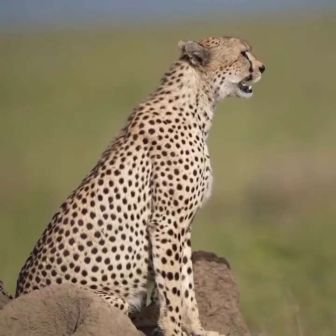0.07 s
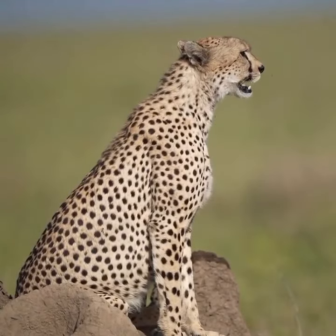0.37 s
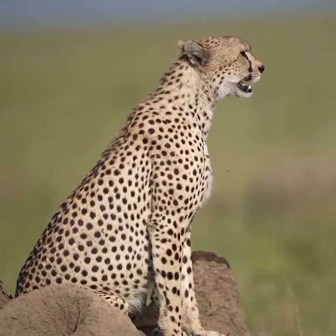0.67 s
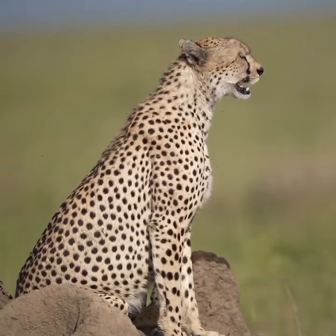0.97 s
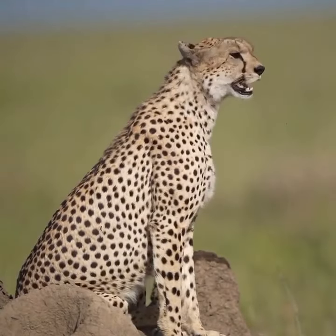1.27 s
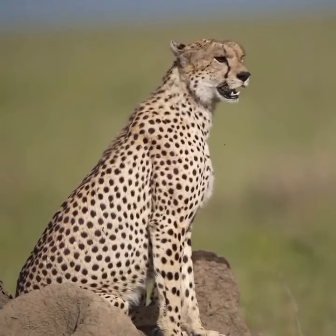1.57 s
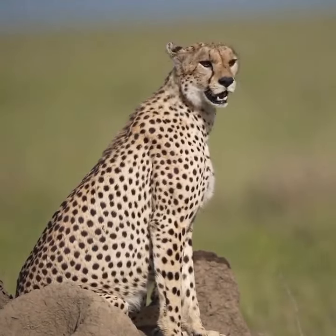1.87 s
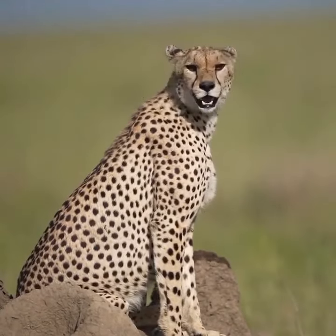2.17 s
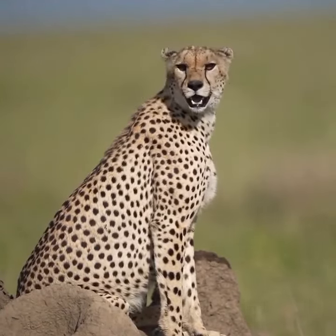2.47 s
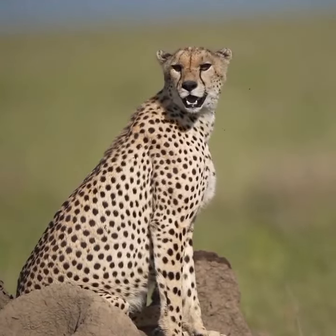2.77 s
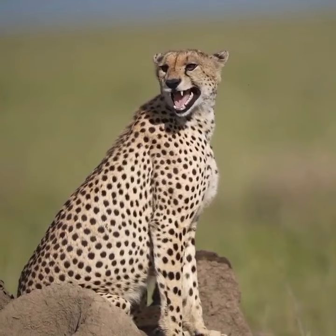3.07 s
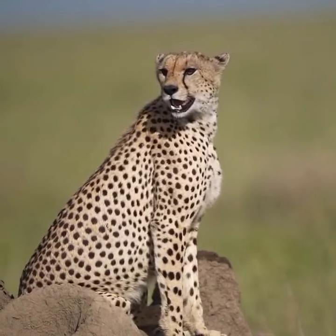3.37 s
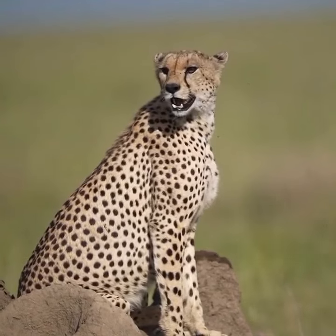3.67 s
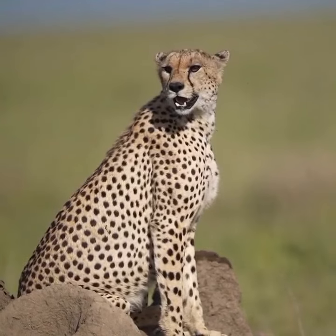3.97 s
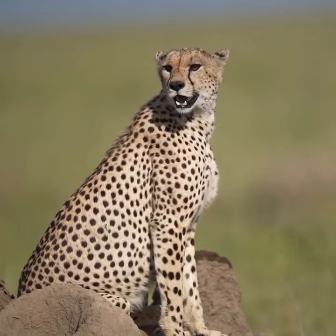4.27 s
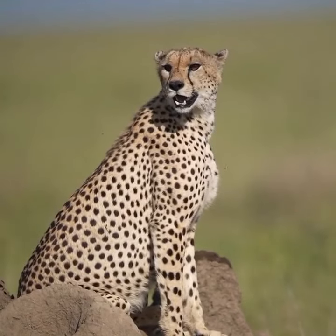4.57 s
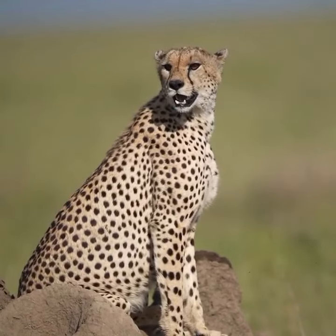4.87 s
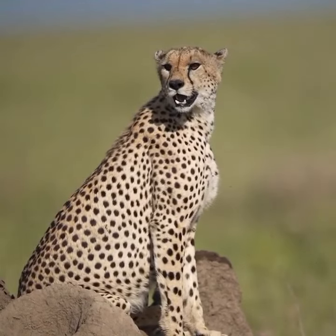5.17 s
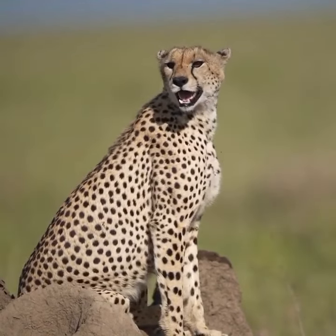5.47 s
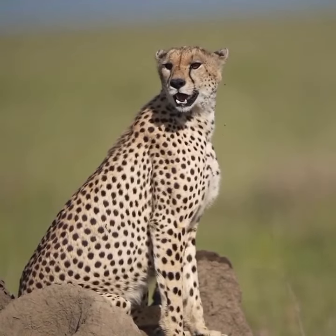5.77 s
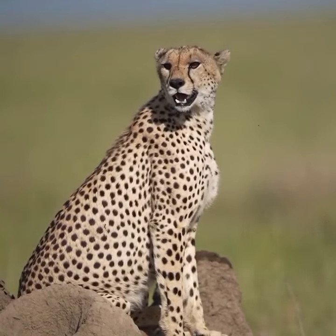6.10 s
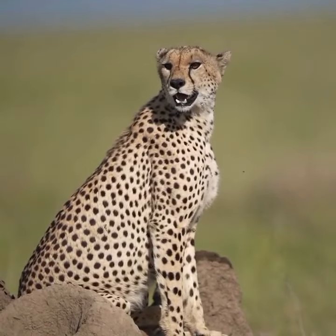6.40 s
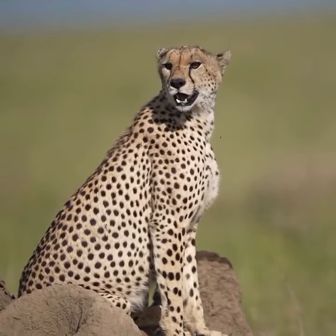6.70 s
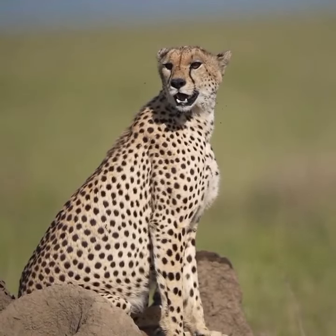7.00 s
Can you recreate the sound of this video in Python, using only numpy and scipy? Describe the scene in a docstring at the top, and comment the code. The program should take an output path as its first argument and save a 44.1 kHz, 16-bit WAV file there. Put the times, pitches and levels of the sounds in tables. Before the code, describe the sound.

On an open grassy plain, a cheetah gives three short chirps about two seconds apart, each rising, then turning rough as it falls. The last two are louder. Wind buffets the microphone with rumble and short thumps, dying down before the final call, which follows one soft tick. Small birds whistle, twitter and chip further off over a faint hiss.

```python
"""Cheetah chirps on a windy plain

A cheetah chirps three times, its vocal folds driving the resonances of throat and mouth: each call
arches up with one push of effort, turns rough as it falls and ends low. Turbulent gusts buffet a stereo
microphone in short thumps. Further off, over a faint hiss, small birds repeat phrases, whistles and
chips, mostly gliding near-sine tones. One soft tick comes before the last chirp."""
import sys
import numpy as np
from scipy import signal
from scipy.fft import rfft, irfft
from scipy.io import wavfile
from scipy.ndimage import map_coordinates

SR = 44100
rng = np.random.default_rng(int(sys.argv[2]) if len(sys.argv) > 2 else 0)


def generate_wav(signal):
    """Clip the signal to [-1, 1] and save it as 16-bit WAV at the path in sys.argv[1]."""
    frames = np.transpose(np.atleast_2d(signal))
    scaled = np.clip(frames, -1, 1) * 32767
    pcm = np.round(scaled).astype(np.int16)
    wavfile.write(sys.argv[1], SR, pcm)


N = 319284
T = np.arange(N) / SR
FREQ = np.maximum(np.fft.rfftfreq(N, 1 / SR), 1)
SIDES = np.array([[.5], [-.5]])  # splits a left-minus-right difference between the channels


def undb(db):
    """Decibels to amplitude ratio."""
    return 10 ** (np.asarray(db) / 20)


def unit(x):
    """Normalisation to rms 1."""
    return x / np.sqrt(np.mean(np.abs(x) ** 2) + 1e-20)


def over_time(points, t):
    """Linear interpolation of a table over time."""
    return np.interp(t, *np.transpose(points))


def over_frequency(points, hz):
    """Interpolation of a table on a log frequency axis."""
    f, value = np.transpose(points)
    return np.interp(np.log(hz), np.log(f), value)


def noise(gain):
    """Spectral shaping: noise of rms 1 with the given relative gain at each frequency."""
    return unit(irfft(rfft(rng.standard_normal(N)) * gain, N))


def wobble(hz, size):
    """Random modulation: a smooth signal of spread near 1, band-limited to about hz."""
    knots = rng.standard_normal(size // 4 + 8)
    used = int(size * min(2 * hz / SR, 1 / 4)) + 8
    return map_coordinates(knots[:used], [np.arange(size) * 2 * hz / SR], order=3, mode="mirror")


def add(out, sound, s):
    """Superposition: mix a sound in at time s."""
    i = int(s * SR)
    part = sound[..., max(-i, 0):N - i]
    out[..., max(i, 0):max(i, 0) + part.shape[-1]] += part


def scatter(x, t60_s):
    """Diffuse reflection: grass and mounds return a decaying tail, different on each side."""
    t = T[:SR // 2]
    tail = rng.standard_normal((2, len(t))) * np.exp(-np.log(1000) * t / t60_s)
    tail *= 1 - np.exp(-t / 0.0041)
    tail /= np.linalg.norm(tail, axis=1, keepdims=True)
    return signal.fftconvolve(x[None], tail, axes=1)[:, :N]


# spectrum of the background hiss: frequency_hz, gain_db
AIR_SPECTRUM = [(24, -28), (40, -7.5), (123, -8.5), (350, -11), (577, 3.5), (637, -2), (1020, -6.5),
                (1910, -5.5), (2160, -6.5), (2570, -5.5), (3740, -4), (7160, -5.5), (9890, -12),
                (13700, -13), (15500, -13)]


def plain_air(hiss_db=-54.5, lift_db=0.57, whirr_hz=2220, whirr_db=-72):
    """Ambient noise: a steady hiss, most coherent between the sides in the bass, and a thin whirr."""
    colour = undb(over_frequency(AIR_SPECTRUM, FREQ))
    alike = 1 / (1 + FREQ / 900)
    mid = noise(colour * np.sqrt(1 + alike))
    side = noise(colour * np.sqrt(1 - alike))
    whirr = noise(np.exp(-((FREQ - whirr_hz) / 90) ** 2 / 2))
    whirr *= unit(undb(4.3 * wobble(17, N)))
    return undb(hiss_db + lift_db) * unit(mid + 1.8 * SIDES * side) + undb(whirr_db) * whirr


# slant of the wind across the two capsules: time_s, left_lead_rad
WIND_SLANT = [(0, -1.1), (.5, 1.6), (1.8, 1.4), (2.2, 1.6), (2.7, 1.48), (3.1, 1.35), (3.7, 1.16),
              (4.3, 1.62), (5, -0.74), (7.2, -2.3)]
# the hardest eddies: centre_s, peak_db, pitch_hz
EDDIES = [(0.005, -10, 534), (0.014, -8.5, 480), (0.0474, -6, 407), (0.0925, -12, 590), (0.1128, -23, 440),
          (0.1573, -18.5, 418), (0.1976, -14, 424), (0.4133, -9, 346), (0.4229, -12, 502),
          (0.4854, -8, 465), (0.5194, -11.5, 350), (0.9134, -19.5, 456), (1.092, -20, 355),
          (1.781, -17.5, 362), (1.833, -20, 374), (1.9484, -13.5, 336), (2.0511, -9, 560),
          (2.0902, -10, 513), (2.3225, -12.5, 360), (2.3568, -12, 380), (2.482, -13, 403),
          (2.657, -17, 331), (2.69, -15, 396), (2.729, -9.5, 374), (2.76, -12, 510), (2.77, -11, 420),
          (2.807, -7, 433), (2.843, -13.5, 450), (2.876, -16.5, 563), (2.9687, -15, 516), (3, -9, 760),
          (3.0554, -10, 515), (3.0733, -10, 392), (3.0832, -8, 460), (3.1485, -17.5, 440),
          (3.16, -14.5, 585), (3.5599, -9, 306), (3.565, -12, 328), (3.602, -16, 500), (3.62, -16, 475),
          (3.683, -9, 515), (3.7397, -14, 387), (3.796, -11, 456), (3.9031, -7.5, 533), (3.9183, -9, 550),
          (3.947, -9.5, 547), (3.962, -10, 650), (3.982, -12, 720), (3.992, -13, 780), (4.0314, -8.5, 730),
          (4.045, -11, 400), (4.062, -32, 297), (4.091, -22, 280), (4.0799, -9, 444), (4.1126, -12.5, 520),
          (4.1581, -8.5, 447), (4.2996, -12, 501), (4.329, -12.5, 432), (4.4473, -20, 239),
          (4.8125, -23, 317), (5.098, -24.5, 282)]


def thumps(gain_db=-3, width_cycles=0.53, snap=0.21):
    """Pressure pulses: a hard eddy gives the microphone one or two swings with a sharper core."""
    out = np.zeros((2, N))
    t = T[:SR // 40] - .0125
    polarities = np.pi * rng.integers(0, 2, (len(EDDIES), 2))
    for (s, db, hz), (swing_rad, core_rad) in zip(EDDIES, polarities):
        phase = 2 * np.pi * hz * t + SIDES * over_time(WIND_SLANT, s) * 0.79
        envelope = np.exp(-(t * hz / width_cycles) ** 2)
        pressure = np.cos(phase + swing_rad) + snap * np.cos(2 * phase + core_rad)
        add(out, undb(db + gain_db) * envelope * pressure, s + t[0])
    return out


# steady wind between the gusts: time_s, level_db
BREEZE_LEVEL = [(0, -40), (.58, -42), (.7, -50), (1.4, -51.5), (1.62, -57.5), (1.85, -33.5), (2.7, -37),
                (4.42, -39), (4.6, -76.5), (5.02, -54), (5.25, -69), (5.7, -57), (6.35, -68), (6.55, -86),
                (7.24, -94)]
# gusts: start_s, length_s, level_db
WIND_GUSTS = [(0.003, 0.013, -15.5), (0.035, 0.023, -19.5), (.083, 0.029, -22), (0.143, 0.018, -27),
              (.194, 0.015, -26), (0.267, 0.042, -31.5), (0.323, 0.014, -33), (0.417, 0.0096, -18),
              (0.443, 0.058, -29.5), (0.508, 0.038, -31), (0.842, 0.083, -39.5), (1.063, 0.031, -32),
              (1.778, 0.012, -34.5), (1.831, 0.021, -27.5), (1.95, .1, -32), (2.034, 0.068, -25.5),
              (2.096, 0.147, -31), (2.347, 0.017, -24), (2.469, 0.058, -24), (2.654, 0.0069, -28.5),
              (2.683, 0.066, -27.5), (2.746, 0.057, -23), (2.826, 0.045, -22.5), (2.898, .015, -33),
              (2.962, 0.043, -22.5), (3.055, 0.029, -17), (3.098, .025, -35), (3.187, 0.1, -40),
              (3.385, 0.088, -32.5), (3.544, 0.026, -27), (3.603, 0.07, -26.5), (3.669, 0.05, -21.5),
              (3.73, 0.078, -22.5), (3.814, .035, -27), (3.879, 0.036, -20), (3.906, 0.086, -17.5),
              (4.009, 0.044, -18.5), (4.047, 0.045, -14), (4.107, 0.019, -24.5), (4.147, 0.024, -22.5),
              (4.218, 0.051, -30), (4.288, 0.013, -25.5), (4.318, 0.014, -26), (4.378, 0.016, -39),
              (4.788, 0.12, -49.5), (5.969, 0.027, -46), (6.022, 0.095, -43.5), (6.256, 0.17, -53.5),
              (6.766, 0.09, -56.5), (7.086, 0.018, -56)]


def wind_level(attack_s=0.0041, release_s=0.0079, wake_db=-16, wake_s=.006,
               sputter_db=2.6, sputter_hz=30):
    """Incoherent addition: breeze, gusts and eddy wakes sum in power to a sputtering level in dB."""
    power = undb(over_time(BREEZE_LEVEL, T)) ** 2
    for s, length, db in WIND_GUSTS:
        t = T[:int((length + .12) * SR)] - .04
        decay = np.maximum(-t, 0) / attack_s + np.maximum(t - length, 0) / release_s
        add(power, (undb(db) * np.exp(-decay)) ** 2, s + t[0])
    for s, db, _ in EDDIES:
        add(power, (undb(db + wake_db) * np.exp(-T[:SR // 20] / wake_s)) ** 2, s)
    return 10 * np.log10(power) + sputter_db * np.tanh(wobble(sputter_hz, N))


# spectrum of the wind rumble: frequency_hz, density_db
WIND_SPECTRUM = [(15, -39.5), (25, -41.5), (73, -19.5), (178, -6.5), (301, -3), (345, -2.5), (380, -2.5),
                 (444, -4), (779, -11), (1940, -38.5), (2600, -45.5), (3380, -55.5), (5720, -120)]


def wind(gain_db=-2, lull_db=-5, buffet_db=3.5, ceiling_db=-17, brighten=0.26, apart=0.68):
    """Turbulent pressure: eddies batter the capsules in brief bursts; stronger ones sound brighter."""
    force = undb(wind_level() + gain_db)
    force *= unit(undb(buffet_db * np.clip(wobble(80, N), -1.6, 1.8)))
    lulls = np.zeros(N)  # the rumble dips just before each thump
    for s, _, _ in EDDIES:
        add(lulls, np.hanning(SR // 40), s - .022)
    force *= undb(lull_db * np.minimum(lulls, 1))
    force_db = ceiling_db + 20 * np.log10(np.tanh(force / undb(ceiling_db)) + 1e-9)
    colour = undb(over_frequency(WIND_SPECTRUM, FREQ))
    colour /= np.linalg.norm(colour)
    spectra = [colour * np.exp(2j * np.pi * rng.random(len(FREQ))) for _ in range(2)]
    out = 0
    for hz in 25 * 2 ** np.arange(8):
        octave = np.maximum(1 - np.abs(np.log2(FREQ / hz)), 0)
        common, differing = (np.fft.ifft(z * octave, N) * N * np.sqrt(2) for z in spectra)
        # large eddies cover both capsules; small ones meet one before the other
        smallness = np.tanh((hz / 380) ** 1.6)
        lead = over_time(WIND_SLANT, T) * smallness / 2
        mid = common.real * np.cos(lead)
        side = apart * smallness ** .5 * differing.real - common.imag * np.sin(lead)
        tilt_db = brighten * np.log2(np.clip(hz, 100, 1000) / 300) * (force_db + 23.0)
        out = out + (mid + 2 * SIDES * side) * undb(force_db + tilt_db)
    return out


def sing(hz, rasp_hz, flutter=0.9, rasp_db=4, fade_db=3, octave_db=-44):
    """Random modulation roughens a bird's near-sine voice; moving air makes it fade and swell."""
    n = len(hz)
    swell_db = rasp_db * np.tanh(rasp_hz / 200) * wobble(114.9, n)
    swell_db += fade_db * np.clip(wobble(27, n), -2.2, .8)
    phase = 2 * np.pi * np.cumsum(hz + rasp_hz * flutter * wobble(400, n)) / SR
    tone = np.sin(phase) + undb(octave_db) * np.sin(2 * phase)
    return unit(np.hanning(n) ** .25 * undb(swell_db) * tone)


def note(length_s, first_hz, middle_hz, last_hz, rasp_hz):
    """Frequency glide: a bird's note follows a parabola through three pitches."""
    u = np.linspace(0, 1, int(length_s * SR))
    bend_hz = 4 * middle_hz - 2 * first_hz - 2 * last_hz
    return sing(first_hz + (last_hz - first_hz) * u + bend_hz * u * (1 - u), rasp_hz)


# notes of three bird phrases: offset_s, length_s, first_hz, middle_hz, last_hz, rasp_hz, level_db
WARBLE_NOTES = [(-.108, .026, 6000, 5400, 4330, 600, -15), (-.076, 0.03, 4300, 3720, 3230, 450, -12),
                (-.05, 0.045, 3780, 3835, 3810, 280, -8.5), (-.002, 0.02, 4360, 5050, 4260, 300, -1.5),
                (.01, 0.025, 5300, 4600, 3320, 342, -5.5)]
TWITTER_NOTES = [(0, 0.0194, 6140, 6100, 5840, 300, -1.5), (.013, 0.0124, 6030, 5550, 4900, 330, -10),
                 (.027, 0.0133, 6810, 6010, 5600, 262, 2), (.039, 0.0147, 7000, 6060, 5570, 300, 4),
                 (.056, 0.03, 5700, 5200, 4750, 340, -1.5), (.08, 0.0103, 4560, 4880, 5250, 221, 2.5),
                 (.092, 0.02, 5270, 4720, 4080, 220, 0)]
CHIRRUP_NOTES = [(-.064, 0.031, 5780, 5410, 4800, 170, 1), (-.026, .016, 3890, 4710, 5430, 250, 9),
                 (-.002, 0.0222, 5000, 4200, 3700, 200, 5.5)]
# repeats of each phrase: time_s, pitch_ratio, level_db
WARBLE_REPEATS = [(0.036, 1, -27), (0.249, 1.02, -27.5), (0.472, .97, -30)]
TWITTER_REPEATS = [(1.973, 0.97, -37), (2.135, 0.95, -33.5), (2.306, 0.94, -38.5)]
CHIRRUP_REPEATS = [(1.647, 0.93, -54.5), (1.855, 0.9, -55), (2.624, 0.93, -48), (3.604, 1.15, -48.5),
                   (4.208, 1, -50.5), (4.354, 0.94, -57.5), (4.5, 1, -57.5), (4.64, 1.03, -53),
                   (4.788, 0.96, -54), (4.939, 0.72, -59), (6.202, 0.88, -53), (6.42, 0.85, -55)]


def phrases():
    """Transposition: each phrase of quick notes repeats with all its pitches scaled by one ratio."""
    song = np.zeros(N)
    for notes, repeats in ((WARBLE_NOTES, WARBLE_REPEATS), (TWITTER_NOTES, TWITTER_REPEATS),
                           (CHIRRUP_NOTES, CHIRRUP_REPEATS)):
        for s, ratio, db in repeats:
            for offset, length, *pitches, rasp_hz, note_db in notes:
                tone = note(length, *(ratio * np.array(pitches)), rasp_hz)
                add(song, undb(db + note_db) * tone, s + offset)
    return song


def far_birds(chorus_db=-66, direct_db=-9, pan_db=-6, count=260):
    """Diffuse field: distant chips in three registers arrive more by scattering than directly."""
    out = np.zeros((2, N))
    for when, pitch, glide, size, side in rng.random((count, 5)):
        hz = rng.choice([3700, 4700, 7100]) * (.9 + .2 * pitch)
        drop_hz = 900 * (glide - .25)
        chip = note(0.023 + 0.052 * size, hz + drop_hz, hz, hz - drop_hz, rasp_hz=260)
        add(out, undb(chorus_db + SIDES * pan_db * side) * chip, when * (N - 1) / SR)
    return undb(direct_db) * out + scatter(out.mean(axis=0), t60_s=0.48) * undb(SIDES * pan_db)


# quick bird sweeps: start_s, first_hz, last_hz, level_db
SWEEPS = [(0.235, 4650, 5930, -33.5), (1.055, 4560, 6540, -55), (3.316, 5400, 4150, -42),
          (3.355, 5170, 4240, -50), (3.548, 5480, 4230, -45.5), (3.66, 5600, 4400, -40.5),
          (4.718, 5420, 4250, -46), (6.6, 4460, 3550, -43.5), (6.607, 4520, 7000, -45),
          (6.625, 4400, 4630, -42.5), (6.646, 7170, 5000, -40.5), (6.884, 4160, 6560, -41),
          (6.76, 5000, 4220, -36), (6.927, 7400, 4680, -37), (7.038, 5020, 4110, -38),
          (7.145, 3800, 3070, -52)]


def sweeps(length_s=.02):
    """Fast frequency sweeps: each flicks up or down through the geometric mean of its end pitches."""
    song = np.zeros(N)
    for s, first, last, db in SWEEPS:
        add(song, undb(db) * note(length_s, first, np.sqrt(first * last), last, rasp_hz=150), s)
    return song


# falling whistles: start_s, length_s, first_hz, last_hz, rasp_hz, level_db
FALLING_WHISTLES = [(0.566, 0.24, 4180, 3170, 60, -59), (1.578, .065, 3730, 3430, 66, -53.5),
                    (1.663, 0.19, 4010, 3630, 37, -58), (1.723, 0.056, 5070, 4790, 18, -36),
                    (1.913, 0.16, 4230, 3573, 8.8, -37.5), (2.048, 0.028, 3650, 3150, 12, -42.5),
                    (2.25, 0.25, 3900, 3795, 66, -55.5), (2.543, 0.038, 3710, 3550, 190, -47.5),
                    (2.705, .04, 3700, 3350, 40, -64), (2.895, 0.054, 3440, 3390, 20, -59),
                    (3.679, 0.4, 4600, 2604, 64, -48), (5.018, 0.064, 3700, 3480, 93, -46),
                    (5.102, 0.053, 3700, 3265, 50, -48.5), (5.17, 0.062, 3990, 3790, 74, -56),
                    (5.308, 0.13, 4950, 3840, 80, -52), (5.327, 0.095, 3440, 3100, 60, -58.5),
                    (5.598, 0.31, 4793, 3103, 65, -43.5), (5.602, 0.2, 3310, 2666, 99, -54),
                    (5.903, 0.074, 2720, 2650, 28, -59), (5.92, 0.033, 3940, 3850, 34, -57),
                    (6.255, 0.12, 3310, 3007, 40.2, -57), (6.556, 0.056, 5000, 4450, 110, -49.5),
                    (6.452, 0.075, 3800, 3700, 30, -66), (6.84, 0.12, 3300, 3180, 18, -66)]


def falling_whistles(sag=0.079, fade_db_per_s=-46.5, flicker_db=4.2, flicker_hz=43.5,
                     trail_s=0.032, trail_db=-1):
    """Interference: a falling whistle beats against its own reflections, and moving air breaks it up."""
    song = np.zeros(N)
    for s, length, first, last, rasp_hz, db in FALLING_WHISTLES:
        middle = (first + last) / 2 - sag * (first - last)
        tone = note(length, first, middle, last, rasp_hz / 2)
        unrest = np.tanh(rasp_hz / 50)
        waver_db = flicker_db * unrest * np.minimum(wobble(flicker_hz, len(tone)), 1)
        tone = undb(db) * unit(tone * undb(fade_db_per_s * T[:len(tone)] + waver_db))
        add(song, tone, s)
        trail = rng.standard_normal(SR // 5) * np.exp(-T[:SR // 5] / trail_s)
        reflections = signal.fftconvolve(tone, trail / np.linalg.norm(trail))
        add(song, undb(trail_db) * unrest ** 2 * reflections, s)
    return song


# raspy high chips: start_s, level_db
RASPY_CHIPS = [(0.743, -48), (1.079, -42.5), (1.745, -49.5), (2.455, -51), (2.505, -53), (2.554, -50),
               (2.649, -43), (2.748, -48), (2.85, -55), (2.96, -52.5), (3.06, -55), (3.31, -49), (3.4, -46),
               (3.575, -45), (3.679, -43), (3.782, -39.5), (3.922, -43), (4.06, -55), (4.175, -46),
               (4.272, -50), (4.385, -56), (4.575, -53.5), (4.73, -63), (4.825, -53.5), (6.067, -48),
               (6.313, -49), (7.2, -47)]


def raspy_chips(length_s=0.036, centre_hz=7100, sharpness=6, rattle_db=3.0, rattle_hz=130):
    """Amplitude modulation: noise from one broad resonance flutters into a quick dry rattle."""
    envelope = np.zeros(N)
    for s, db in RASPY_CHIPS:
        add(envelope, undb(db) * np.hanning(int(length_s * SR)) ** .5, s)
    resonance = (1 + ((FREQ / centre_hz - centre_hz / FREQ) * sharpness) ** 2) ** -.8
    rattle = unit(undb(rattle_db * wobble(rattle_hz, N)))
    return envelope * rattle * noise(resonance)


# resonances of the cheetah's throat and mouth: centre_hz, width_hz, gain_db
FORMANTS = [(548, 170, -13), (1327, 420, 0), (1612, 400, 8.5), (2730, 560, 2), (2890, 940, -5),
            (3700, 546, -24.5), (4800, 900, -33)]


def vocal_tract(hz):
    """Formant filtering: the gain of steep resonances with deep valleys between."""
    return sum(undb(db) / (1 + ((hz / f - f / hz) * f / width) ** 2) for f, width, db in FORMANTS)


def gesture(call, t, onset_db=-24.5, slack_db=-14.5, release_db=-22.5, break_db=3.5,
            break_width_s=0.021, slack_rough=0.4, jaw_sag=0.05):
    """Vocal effort: one push lifts pitch, level and brightness; the voice breaks as it lets go."""
    start, top, end, rise_s, fall_s, release_s, top_hz, slack_hz, db = call[:9]
    break_rough, break_s, speak_s, close_s, tilt, _ = call[9:]
    since = t - top
    slack = 1 - np.exp(-np.where(since < 0, np.abs(since / rise_s) ** 3, (since / fall_s) ** 2))
    breaking = np.exp(-((since - break_s) / break_width_s) ** 2)
    release, closing = (np.clip(1 - (end - t) / s, 0, 1) for s in (release_s, close_s))
    pitch_hz = top_hz + (slack_hz - top_hz) * slack
    level_db = db + np.where(since < 0, onset_db, slack_db) * slack
    level_db += break_db * breaking + release_db * release ** 0.88
    roughness = slack_rough * slack + break_rough * breaking
    tilt_db_per_octave = tilt - 2 * slack - 31 * closing  # the closing mouth dulls the voice
    speaking = np.clip((t - start) / speak_s, .4, 1)  # upper partials come in late
    jaw = 1 - jaw_sag * slack  # a relaxed jaw lowers the formants
    return pitch_hz, level_db, roughness, tilt_db_per_octave, speaking, jaw


def breath(cycles, roughness, mouth, rasp_db=-15, rasp_floor=.22, hiss_db=-43.5, hiss_hz=7200):
    """Turbulence: air pulsed once a cycle by the folds rasps in the throat and hisses past the teeth."""
    n = len(cycles)
    puffs = rfft(rng.standard_normal(n) * (1 + 0.22 * np.cos(2 * np.pi * cycles)))
    f = np.maximum(np.fft.rfftfreq(n, 1 / SR), 1)
    rasp = unit(irfft(puffs * vocal_tract(f / mouth) * np.minimum(f / 4500, 1) ** 1.8, n))
    hiss = unit(irfft(puffs * (hiss_hz / f) ** 2 / (1 + (hiss_hz / f) ** 10), n))
    return undb(rasp_db) * (roughness + rasp_floor) * rasp + undb(hiss_db) * hiss


def chirp(call, mouth, jitter=0.018, shimmer=0.33, doubling=0.068, clean_hz=8000, hoarse_hz=5200,
          soft_db=-21):
    """Source and filter: folds ring the throat; rough cycles turn uneven and alternate in strength."""
    start, _, end, *_, fundamental_db = call
    t = np.arange(start, end, 1 / SR)
    n = len(t)
    hz, db, roughness, tilt, speaking, jaw = gesture(call, t)
    cycles = np.cumsum(hz * (1 + 0.0036 * wobble(50.6, n))) / SR
    cycles += jitter * roughness * wobble(257.7, n)
    # softly blown folds close gently, so the upper partials die first
    cutoff_hz = clean_hz * np.minimum(undb(0.37 * (db - soft_db)), speaking)
    voice, power = 0, 0
    for k in range(1, 16):
        partial_hz = k * hz
        waver_db = 0.9 * min(k, 5) * np.tanh(wobble(39.5, n))
        tilt_db = tilt * np.log2(np.clip(partial_hz, 1000, 3100) / 1500)
        gain = vocal_tract(partial_hz / (mouth * jaw)) / (1 + (partial_hz / cutoff_hz) ** 6)
        gain *= undb(tilt_db + waver_db + fundamental_db * (k == 1))
        subharmonic = doubling * np.tanh(partial_hz / 4000) * np.cos(np.pi * cycles)
        uneven = 1 + roughness * (shimmer * wobble(201, n) + subharmonic)
        # phase noise turns the high partials hoarse
        stray_rad = np.minimum(partial_hz / hoarse_hz, 1.3) ** 4 * (.08 + 1.8 * roughness)
        voice += gain * uneven * np.cos(2 * np.pi * k * cycles + stray_rad * wobble(180, n))
        power += gain ** 2 / 2
    edges = np.clip(np.minimum(t - t[0], t[-1] - t) / 0.0046, 0, 1)
    return (voice / np.sqrt(power) + breath(cycles, roughness, mouth)) * undb(db) * edges


# the cheetah's calls: start_s, top_s, end_s, rise_s, fall_s, release_s, top_hz, slack_hz, level_db,
# break_roughness, top_to_break_s, speak_s, mouth_close_s, tilt_db_per_octave, fundamental_db
CALLS = [(1.203, 1.266, 1.395, 0.045, 0.052, 0.028, 739, 545, -19.5, 0.5, 0.044, 0.06, 0.069, 9, 10),
         (3.149, 3.2, 3.318, 0.037, 0.048, 0.022, 786, 536, -12.5, 0.33, 0.041, 0.04, 0.054, -0.5, -3.5),
         (5.431, 5.478, 5.635, 0.051, 0.06, 0.067, 829, 522, -11.5, 0.26, 0.032, 0.02, 0.076, -1, -2)]
# the mouth opens wider from call to call and lifts the resonances: formant_ratio
MOUTH_OPENINGS = [0.863, 0.98, 0.99]
# phase difference of the voice between the capsules: frequency_hz, left_lead_rad
VOICE_PHASE = [(430, .3), (1600, -.35), (2240, -1), (3300, -2.7), (4570, -5.2), (5860, -6.1),
               (12000, -12.5)]
# level difference of the voice between the capsules: frequency_hz, left_minus_right_db
VOICE_BALANCE = [(600, -1.5), (1500, -4), (2400, -1.5), (3400, -16.5), (6000, -7.5), (12000, -6)]


def cheetah(direct_db=-1.57, field_db=-38, echo_db=-17, echo_s=.0069):
    """Comb filtering: one near reflection ripples three almost dry chirps from a little to the right."""
    voice = np.zeros(N)
    for call, mouth in zip(CALLS, MOUTH_OPENINGS):
        add(voice, chirp(call, mouth), call[0])
    balance = undb(SIDES * over_frequency(VOICE_BALANCE, FREQ) + direct_db)
    lead = np.exp(1j * SIDES * over_frequency(VOICE_PHASE, FREQ))
    comb = 1 + undb(echo_db) * np.exp(-2j * np.pi * FREQ * echo_s)
    direct = irfft(rfft(voice) * balance * lead * comb, N)
    return direct + undb(field_db) * scatter(voice, t60_s=0.76)


# arched whistles: start_s, length_s, top_hz, level_db
ARCHED_WHISTLES = [(1.367, 0.086, 3730, -53), (1.413, 0.17, 4580, -56.5), (2.09, 0.14, 4450, -35),
                   (4.973, 0.031, 4760, -52), (5.123, 0.24, 2444, -54.5), (6.07, 0.032, 5700, -43),
                   (6.287, 0.038, 5440, -43), (6.697, 0.08, 5290, -34.5), (6.9, 0.039, 4680, -42.5),
                   (6.986, 0.086, 5154, -37)]


def arched_whistles(first_ratio=0.72, last_ratio=.88, scoop_share=.11):
    """Frequency modulation in one arch: a whistle scoops up, holds and droops."""
    song = np.zeros(N)
    for s, length, top_hz, db in ARCHED_WHISTLES:
        u = np.linspace(0, 1, int(length * SR))
        contour = 1 - (1 - first_ratio) * np.exp(-u / scoop_share) - (1 - last_ratio) * u ** 3
        add(song, undb(db) * sing(top_hz * contour, rasp_hz=35), s)
    return song


# soft runs of bird chatter: start_s, end_s, spacing_s, pitch_hz, level_db
CHATTER_RUNS = [(4.716, 4.767, 0.021, 4510, -59), (6.098, 6.159, 0.019, 3700, -52.5),
                (6.345, 6.403, 0.022, 3610, -51), (6.881, 6.96, 0.024, 3320, -56),
                (7.015, 7.1, 0.023, 3105, -54.5), (7.15, 7.22, 0.021, 3270, -56.5)]


def chatter(note_s=0.053, drop=0.148, spread=0.089):
    """Jitter: overlapping downward notes come unevenly in time and pitch."""
    song = np.zeros(N)
    for start, end, spacing_s, pitch_hz, db in CHATTER_RUNS:
        times = np.arange(start, end - note_s / 2, spacing_s)
        for s, (late, high) in zip(times, rng.uniform(-0.91, 1, (len(times), 2))):
            hz = pitch_hz * (1 + spread * high)
            tone = note(note_s, hz * (1 + drop), hz, hz * (1 - drop), rasp_hz=200)
            add(song, undb(db) * tone, s + late * spacing_s / 3)
    return song


# thin clean peeps: start_s, level_db
HIGH_PEEPS = [(4.803, -49), (5.71, -51.5), (6.028, -45), (6.327, -42), (6.617, -43), (6.909, -51),
              (7.219, -56)]


def peeps(length_s=0.019, hz=7660, glide_hz=130):
    """Tone bursts: short, high bird notes that rise slightly."""
    song = np.zeros(N)
    for s, db in HIGH_PEEPS:
        add(song, undb(db) * note(length_s, hz - glide_hz, hz, hz + glide_hz, rasp_hz=60), s)
    return song


# a soft dry tick: start_s, level_db
DRY_TICK = [(5.006, -42.5)]


def tick(decay_s=0.013, body_hz=1500, body_db=10):
    """Exponential decay: a faint burst of noise with one resonance for body."""
    envelope = np.zeros(N)
    for s, db in DRY_TICK:
        add(envelope, undb(db) * np.exp(-T[:SR // 20] / decay_s), s)
    rolloff = 1 / np.sqrt(1 + (FREQ / 5000) ** 2)
    body = undb(body_db) / (1 + ((FREQ - body_hz) / 250) ** 2)
    return envelope * noise(rolloff + body)


# a trill that runs down the scale: start_s, first_hz, last_hz, level_db
FALLING_TRILL = (6.65, 4550, 3620, -39.5)


def trill(note_s=.0195, first_drop=0.123, last_drop=0.085, count=7):
    """Sawtooth frequency modulation: downward sweeps follow without a gap, each lower and shallower."""
    song = np.zeros(N)
    s, first_hz, last_hz, db = FALLING_TRILL
    for k in range(count):
        progress = np.sqrt(k / (count - 1))
        hz = first_hz + (last_hz - first_hz) * progress
        drop = first_drop + (last_drop - first_drop) * progress
        tone = note(note_s, hz * (1 + drop), hz, hz * (1 - drop / 2), rasp_hz=50)
        add(song, undb(db) * tone, s + k * note_s)
    return song


def near_birds(gain_db=-2, field_db=-7, phrase_direct_db=-3.5, blur_db=-5, pan_db=-4, lead_rad=-1.5):
    """Level and phase differences set the birds to the right; grass blurs the phrases sung low in it."""
    clear = falling_whistles() + arched_whistles() + peeps() + sweeps()
    clear += chatter() + raspy_chips() + trill()
    in_grass = phrases()
    direct = irfft(rfft(clear + undb(phrase_direct_db) * in_grass) * np.exp(1j * SIDES * lead_rad), N)
    diffuse = undb(field_db) * scatter(clear, t60_s=0.15) + undb(blur_db) * scatter(in_grass, t60_s=0.18)
    return (direct + diffuse) * undb(gain_db + SIDES * pan_db)


def scene(wind_pan_db=-1.2):
    """Superposition: the cheetah, the wind, a tick, the birds and the hiss of the plain."""
    calls = cheetah()
    buffeting = (wind() + thumps()) * undb(SIDES * wind_pan_db)
    return calls + buffeting + tick() + near_birds() + far_birds() + plain_air()


def record(dry, low_cut_hz=42, high_cut_hz=15550):
    """Band limiting: a gentle high-pass thins the deepest bass and a steep low-pass cuts the top."""
    thinned = signal.sosfilt(signal.butter(2, low_cut_hz, "high", fs=SR, output="sos"), dry)
    return signal.sosfilt(signal.ellip(10, .2, 80, high_cut_hz, fs=SR, output="sos"), thinned)


dry = scene()
out = record(dry)
generate_wav(out)
```